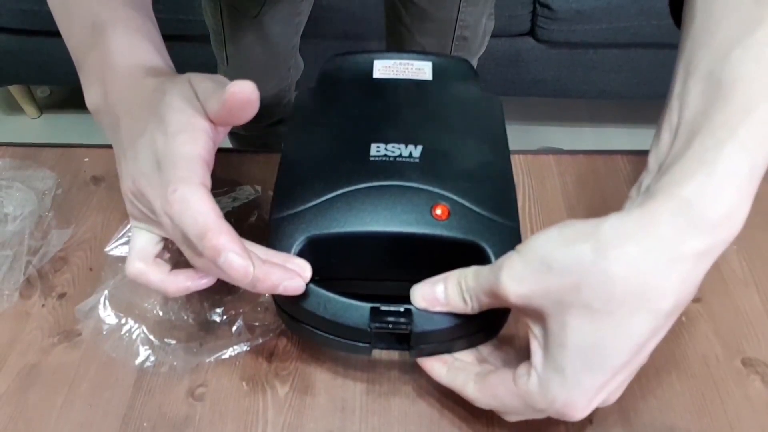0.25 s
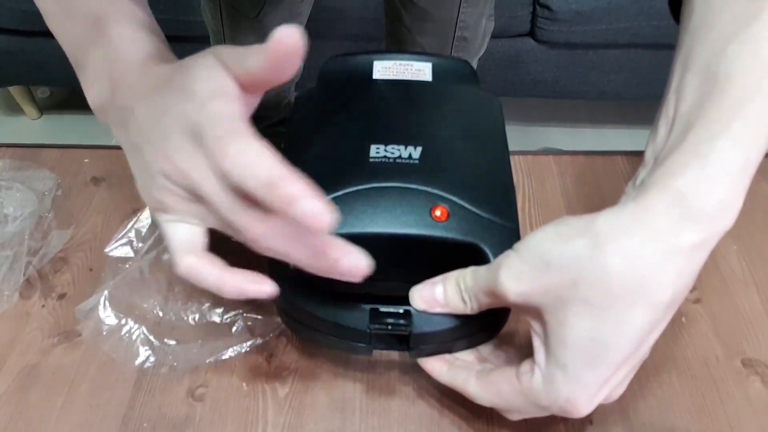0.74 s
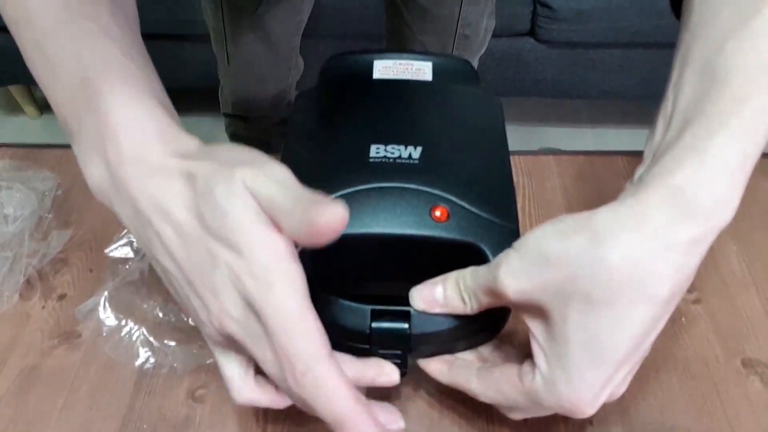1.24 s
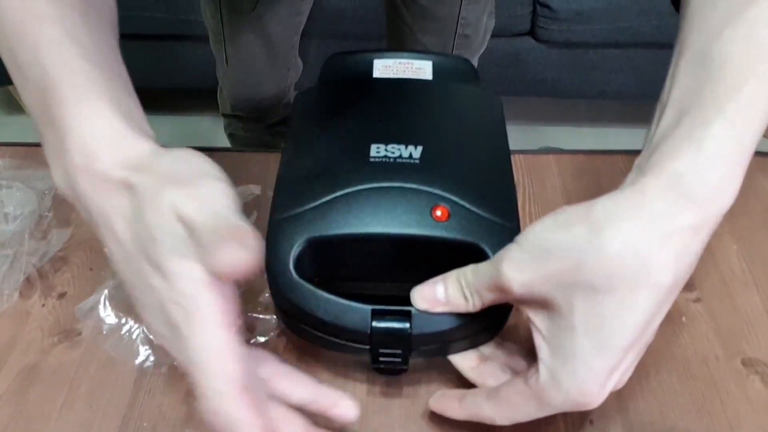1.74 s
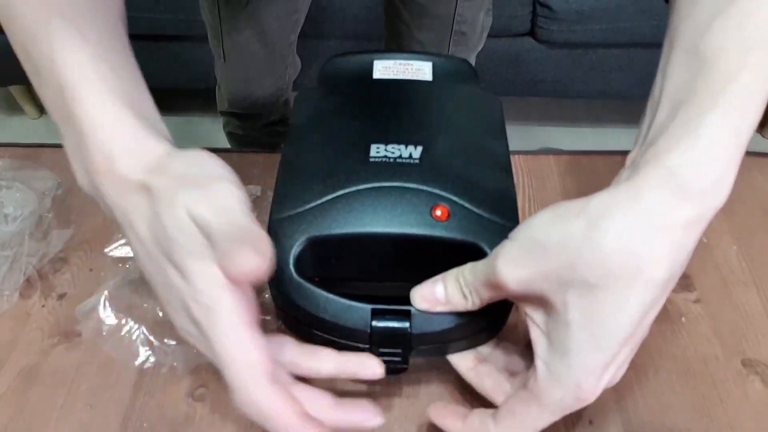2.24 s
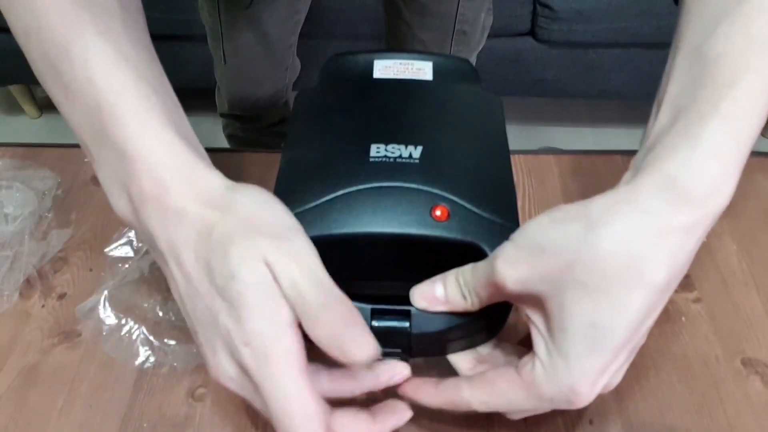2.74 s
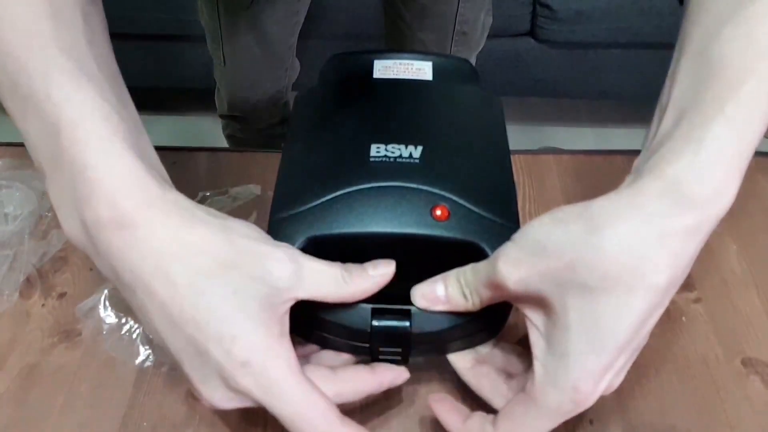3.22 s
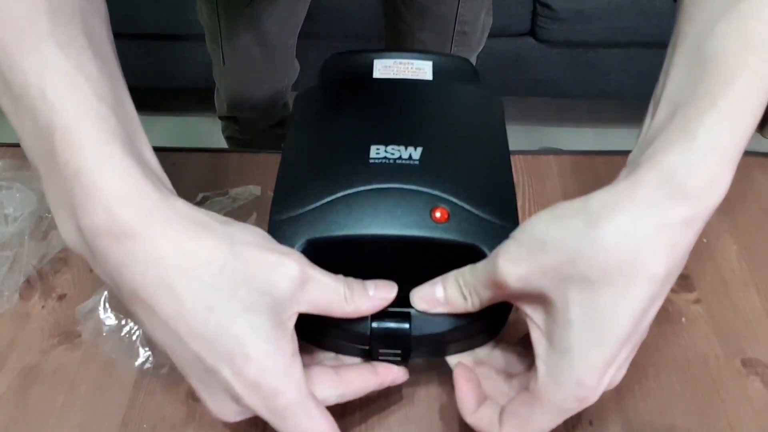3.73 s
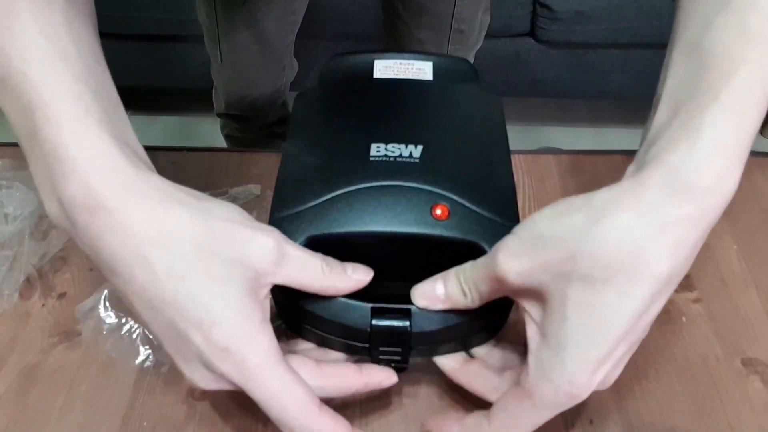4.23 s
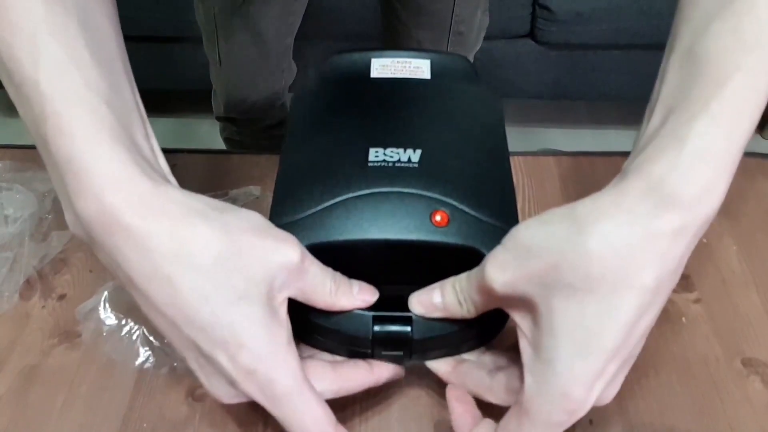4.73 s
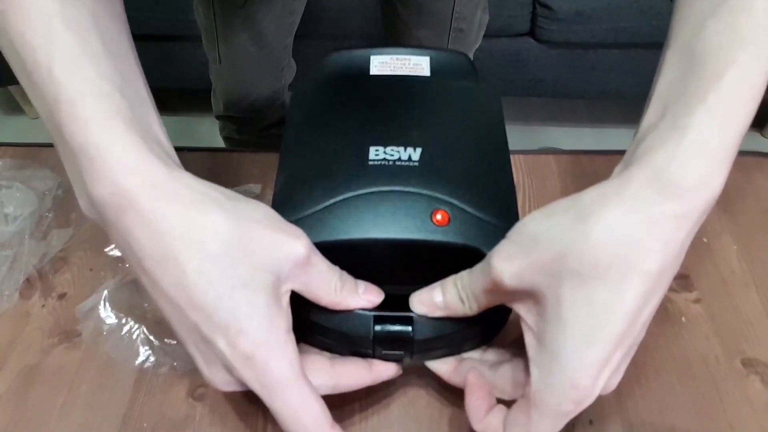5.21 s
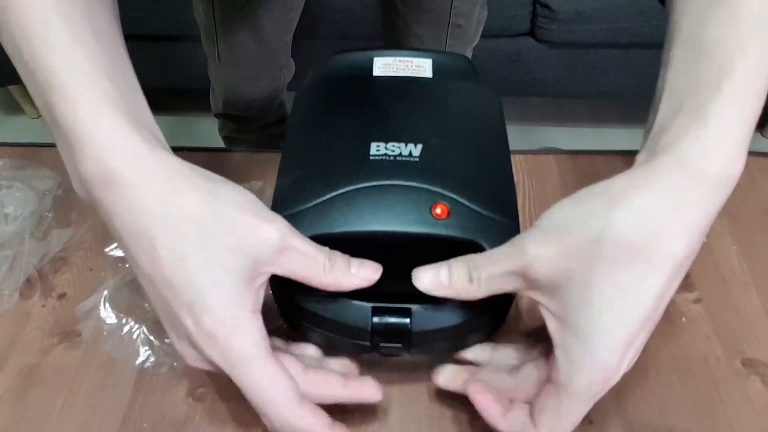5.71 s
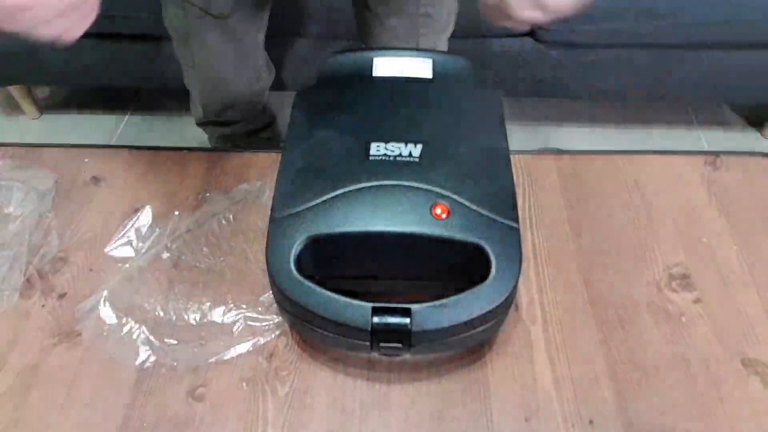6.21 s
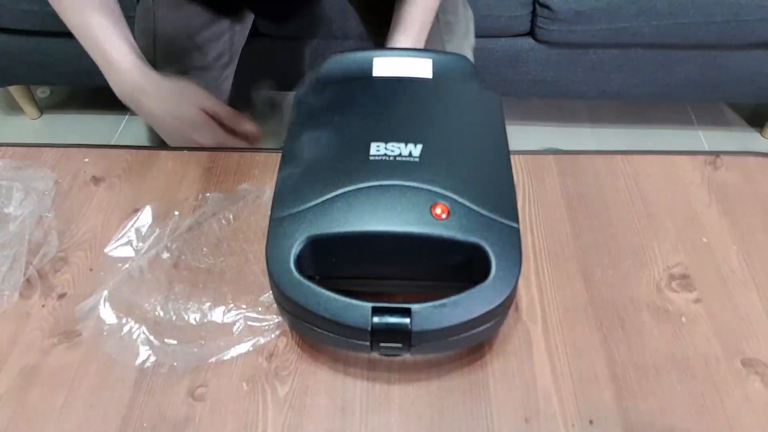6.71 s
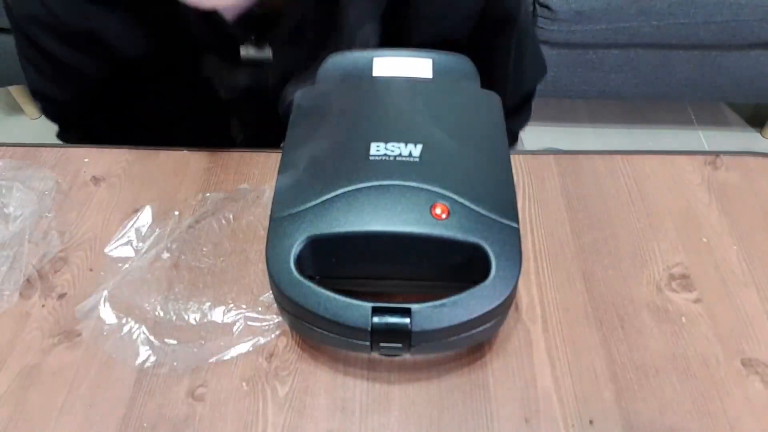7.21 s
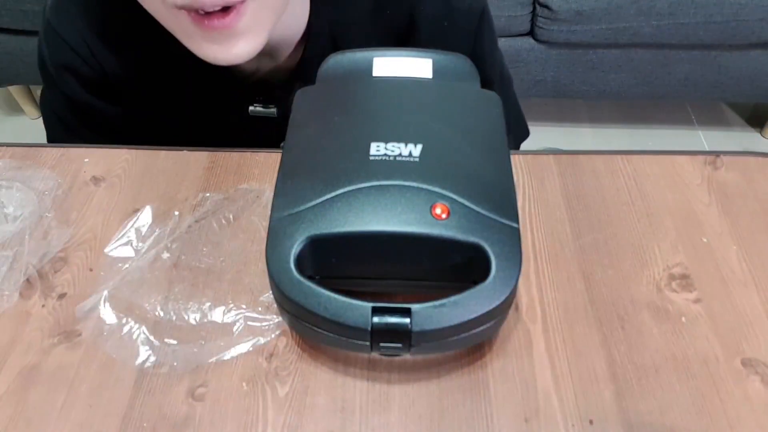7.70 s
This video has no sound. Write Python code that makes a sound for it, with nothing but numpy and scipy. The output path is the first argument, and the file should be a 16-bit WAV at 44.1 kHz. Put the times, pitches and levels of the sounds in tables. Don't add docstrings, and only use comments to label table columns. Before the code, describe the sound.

Fat sizzles fiercely in a closed plastic-cased grill as steam whistles downward and sighs, the latch snaps, the case knocks, and small squeaks follow.

```python
import sys
import numpy as np
from scipy import signal
from scipy.io import wavfile
from scipy.ndimage import uniform_filter1d

SR = 44100
rng = np.random.default_rng(int(sys.argv[2]) if len(sys.argv) > 2 else 0)


def volts_from_decibels(level):
    exponent = np.asarray(level, float) / 20
    return 10 ** exponent


def transcribe(signal):
    frames = np.atleast_2d(signal).T
    limited = np.clip(frames, -1, 1)
    pcm = np.round(limited * 32767).astype(np.int16)
    wavfile.write(sys.argv[1], SR, pcm)


N = 350595


def rms_one(x):
    return x / np.sqrt(np.mean(x ** 2) + 1e-20)


def in_time(rows):
    s, *columns = np.transpose(rows)
    return [np.interp(np.arange(N) / SR, s, column) for column in columns]


def at_hz(points, hz):
    point_hz, point_db = np.transpose(points)
    return np.interp(np.log(hz), np.log(point_hz), point_db)


def drift(rate_hz):
    r = np.exp(-80 * np.pi * rate_hz / SR)
    slow = signal.lfilter([1], [1, -2 * r, r * r], rng.standard_normal(N // 40 + 2002))
    slow = slow[2000:]
    return np.interp(np.arange(N) / 40, np.arange(len(slow)), rms_one(slow - slow.mean()))


def band(x, low_hz, high_hz):
    return signal.sosfilt(signal.butter(2, [low_hz, high_hz], "band", fs=SR, output="sos"), x)


def resonance(x, hz, width_hz):
    r = np.exp(-np.pi * width_hz / SR)
    zeros = np.array([1, 0, -1]) * (1 - r * r) / 2
    return signal.lfilter(zeros, [1, -2 * r * np.cos(2 * np.pi * hz / SR), r * r], x)


def dying(starts, t60_s):
    return signal.lfilter([1], [1, -volts_from_decibels(-60 / (t60_s * SR))], starts)


def grains(per_s, spread_db):
    sizes = volts_from_decibels(spread_db * np.minimum(rng.exponential(1, N), 5)) * rng.choice([-1, 1], N)
    return rms_one(sizes * (rng.random(N) < per_s / SR))


def frying_strength():
    # time in seconds, vigour in dB, fine mist of fat in dB.
    fry = [(0, 8, 5), (.3, 10, 7), (.6, 7.5, 9), (.8, 5.5, 3), (1.15, 3, 6), (1.5, 3, 2), (2.3, 3, 4),
           (3.2, 1.5, 5), (3.6, 2.5, 4.5), (4.5, 4, -0.5), (4.85, 2, 3.5), (5.25, -1.5, 2.5),
           (5.6, -1, -0.5), (6.1, 1.2, 3.5), (6.65, 2, -1), (7.0, 2.5, 5), (7.95, 2, 5.5)]
    # press starts, seam sealed and let go in seconds, loss in dB.
    presses = [
        (1.68, 1.963, 2.06, -4.5),
        (3.9, 4.024, 4.325, -6),
        (5.6, 5.744, 5.93, -1.5),
    ]
    # dB per dB, for the cupping hands plain dB.
    vigour_share = [1.04, 1.05, 0.64, 0.97]
    spray_share = [0.093, 0.081, 0.19, 0.86]
    seal_share = [1.53, 1.6, 1.5, 2.1]
    cupped_db = [1.63, 0.8, -0.5, 4]
    reopen_s, hands_away_s = 0.04, 5.96

    vigour, mist = in_time(fry)
    sealed = 0
    for start, shut, free, loss_db in presses:
        sealed = sealed + in_time([(start, 0), (shut, loss_db), (free, loss_db), (free + reopen_s, 0)])[0]
    cupped, = in_time([(hands_away_s, 1), (hands_away_s + reopen_s, 0)])
    shares = np.transpose([vigour_share, spray_share, seal_share, cupped_db])
    return shares @ [vigour, mist, sealed, cupped]


def sizzle():
    fry_centres_hz = [900, 3200, 7700, 9600]
    # frequency in Hz, level in dB per Hz.
    spectrum = [(18, -52), (30, -15), (239, -15.5), (280, -16), (461, -7), (684, -4.5), (844, -3.5),
                (1190, -7), (2120, -4.5), (3400, -1), (6720, -5.5), (8740, -12), (14000, -17), (16000, -18)]
    # frequency in Hz, side minus mid in dB.
    stereo_width = [(60, -19), (110, -17), (200, -37), (380, -30), (700, -28.5), (1290, -29), (2380, -14),
                    (4400, -15), (8120, -7), (11500, -5.5), (15000, -5)]
    # frequency in Hz, width in Hz, level over the sizzle in dB.
    hollows = [(277.8, 28.5, 11), (669.4, 41.6, 8.5), (853, 60, 0.5), (1073, 66, -0.5), (1200, 73, 4),
               (1452, 33, -6), (1797, 51, -4.5), (2490, 480, -5), (2897, 39, -5), (3400, 51, -4),
               (3860, 59, -0.5), (4165, 43, 1), (4810, 28, -4.5)]
    level_of_all_db, steady = -40, slice(6 * SR, None)

    strength = uniform_filter1d(frying_strength(), size=SR // 30, axis=1)
    strength -= strength[:, steady].mean(axis=1, keepdims=True)
    surge, spray = drift(18.0), drift(24.0)
    bursts = grains(2500 * volts_from_decibels(3.0 * surge), spread_db=9.5)
    white = rng.standard_normal((2, 2, N))
    bass, middle = np.geomspace(28, 450, 8)[:-1], np.geomspace(450, 4500, 11)[:-1]
    edges = np.r_[bass, middle, np.geomspace(4500, 17500, 12)]
    out = 0
    for k, (low, high) in enumerate(zip(edges, edges[1:])):
        hz = np.sqrt(low * high)
        place = np.interp(np.log(hz), np.log(fry_centres_hz), np.arange(4))
        below = min(int(place), 2)
        level_db = strength[below] + (place - below) * (strength[below + 1] - strength[below])
        level_db = level_db * np.clip((hz - 130) / 620, .05, 1)
        bright = np.clip(hz / 9000, 0, 1)
        flicker_db = (0.51 + 0.44 * bright) * surge + 0.66 * (hz > 8500) * spray
        flicker_db = flicker_db + 1.5 * drift(13.3) + bright * drift(2.6)
        share = 0.16 + 0.14 * bright
        source = np.sqrt(1 - share) * white[k % 2] + np.sqrt(share) * bursts * [[1], [.6]]
        gain = volts_from_decibels(at_hz(spectrum, min(hz, 15000)) + level_db + flicker_db)
        out = out + gain * band(source, low, high) * [[1], [volts_from_decibels(at_hz(stereo_width, hz))]]
    out = out + sum(volts_from_decibels(db + 2.45 * drift(6.8)) * resonance(out, hz, width) for hz, width, db in hollows)
    return volts_from_decibels(level_of_all_db) * out / out[0, steady].std()


def jet():
    # time in seconds, level in dB.
    jet_level = [
        (0, -36),
        (.15, -36),
        (.55, -40.5),
        (.7, -48),
        (.9, -49.5),
        (1.2, -77),
        (1.5, -99),
    ]
    # frequency in Hz, width in Hz, level in dB.
    nozzle = [(4900, 500, 8.5), (6150, 900, 7.5), (7300, 1600, 9), (8400, 630, 10), (10540, 580, 8.5),
              (11800, 870, 4)]
    noise = rng.standard_normal(N) * volts_from_decibels(2.5 * drift(10.4))
    shaped = 0
    for k, (hz, width, db) in enumerate(nozzle):
        shaped = shaped + volts_from_decibels(db) * (-1) ** k * resonance(noise, hz, width)
    return volts_from_decibels(in_time(jet_level)[0]) * rms_one(band(shaped, 4500, 12200))


def whistle(hz, width_hz, steady):
    low_pass = signal.butter(2, width_hz / 2, fs=SR, output="sos")
    slow = signal.sosfilt(low_pass, rng.standard_normal((2, len(hz) + 999)))[:, 999:]
    slow = rms_one(slow)
    turn = 2 * np.pi * np.cumsum(hz) / SR
    return rms_one((steady + slow[0]) * np.cos(turn) + slow[1] * np.sin(turn))


def steam_whistles():
    # time in seconds, pitch in Hz, level in dB.
    closing = [
        (0, 1418, -32.5),
        (.05, 1350, -44),
        (.08, 1200, -32.5),
        (.18, 1144, -37),
        (.33, 1090, -40.5),
        (.42, 1075, -42),
        (.5, 1040, -47),
    ]
    # time in seconds, pitch in Hz, level in dB.
    sigh = [
        (.4, 897, -63),
        (.44, 800, -39.5),
        (.55, 800, -38),
        (.63, 800, -44),
        (.8, 952, -43.5),
        (1.0, 944, -55),
    ]
    # start and length in seconds, from Hz, to Hz, level in dB.
    squeaks = [(0.221, 0.2, 3500, 3400, -40), (1.688, .07, 3920, 3700, -45),
               (5.647, 0.034, 2910, 3000, -44.5), (0.27, 0.05, 4900, 4850, -36),
               (3.375, 0.042, 2900, 2900, -41), (4.376, 0.13, 3870, 3860, -36),
               (4.481, .1, 3850, 3730, -41.5), (4.479, 0.093, 2950, 2920, -44),
               (4.671, 0.14, 3700, 3810, -40.5), (6.069, 0.035, 3300, 3500, -43),
               (6.635, 0.065, 2620, 3360, -47), (6.824, 0.033, 2330, 2630, -46),
               (6.85, 0.053, 2750, 3250, -48.5), (6.925, .035, 2430, 2500, -47),
               (7.173, 0.021, 2500, 2620, -46), (7.24, 0.03, 3250, 3500, -48),
               (7.428, 0.063, 2890, 3550, -43), (7.27, .08, 3800, 4050, -45),
               (7.515, 0.022, 4600, 4620, -44), (7.618, 0.041, 2630, 3200, -42.5),
               (7.684, .06, 2200, 2850, -40), (7.735, .045, 2900, 3470, -36),
               (7.045, 0.033, 2500, 3520, -44), (.64, 0.081, 3850, 3850, -43),
               (0.837, .05, 3900, 3950, -45), (0.053, 0.1, 3400, 3450, -37), (.56, 0.094, 2400, 2360, -44),
               (4.368, .09, 4100, 4030, -41), (4.59, 0.035, 3850, 3850, -42),
               (7.925, 0.035, 2900, 3000, -42)]
    # start and length in seconds, from Hz, to Hz, level in dB.
    puffs = [(1.44, 0.085, 3600, 3830, -40), (6.1, 0.099, 4120, 4200, -40), (6.127, 0.1, 3300, 2810, -43.5),
             (.2, 0.18, 3680, 3500, -36), (2.652, .15, 3420, 3340, -42), (2.818, .17, 3220, 3600, -42.5),
             (2.977, 0.2, 3240, 3290, -48), (4.665, .07, 2950, 2800, -40.5), (.45, .1, 3800, 3500, -40),
             (6.86, .08, 3000, 3300, -50), (7.77, .06, 3700, 3700, -43), (2.405, .025, 4200, 4000, -43),
             (2.7, .05, 4000, 3700, -43), (2.53, .08, 3800, 4400, -43.5), (3.11, .06, 3300, 3300, -44.5),
             (3.66, .04, 3500, 3300, -44), (7.222, .025, 3500, 3500, -43),
             (6.325, 0.042, 4300, 3600, -38.5), (7.22, .15, 3600, 5600, -48),
             (7.784, .11, 3440, 4200, -43.5), (7.026, 0.067, 3900, 3660, -43.5)]
    squeak_width_hz, puff_width_hz = 360, 950

    hz, level_db = in_time([*closing, (0.7, 1000, -99)])
    out = volts_from_decibels(level_db) * whistle(hz, width_hz=120, steady=1.7)
    hz, level_db = in_time(sigh)
    out += volts_from_decibels(level_db) * whistle(hz, width_hz=283, steady=0.4)
    for rows, width in [(squeaks, squeak_width_hz), (puffs, puff_width_hz)]:
        for s, length, from_hz, to_hz, db in rows:
            at, n = round(s * SR), round(length * SR)
            swell = np.abs(np.sin(np.linspace(0, np.pi, n))) ** 0.39
            tone = whistle(np.linspace(from_hz, to_hz, n), width, steady=squeak_width_hz / width)
            out[at:at + n] += (volts_from_decibels(db) * swell * tone)[:N - at]
    return out


def ticks():
    shape = dying(np.abs(grains(per_s=44, spread_db=2.0)) + 1e-18, t60_s=0.01)
    return volts_from_decibels(-64) * rms_one(band(shape * rng.standard_normal(N), 9000, 16500))


def spits():
    # start in seconds, peak in dB, body re peak in dB, length in seconds.
    droplets = [(0.69, -33, -12, 0.03), (0.822, -28.5, -12, 0.041), (0.912, -27.5, -14, 0.036),
                (1.345, -32, -4, 0.015), (1.481, -32, -42, 0.029), (1.752, -27.5, -7, 0.006),
                (1.935, -28, -14, 0.0051), (2.5, -29, -38, 0.013), (2.846, -32, -22, 0.022),
                (3.0694, -32, -4.5, 0.0069), (3.539, -32.5, 13.5, 0.054), (3.772, -32.5, 12, 0.056),
                (3.866, -30, 0, 0.014), (3.965, -37, -4.5, 0.014), (4.346, -33.5, -12, 0.01),
                (4.555, -31.5, 11, 0.013), (4.598, -33, 10, 0.033), (4.955, -34.5, -4, 0.021),
                (5, -32.5, -18.5, 0.0086), (5.135, -37.5, -12.5, 0.029), (5.3183, -50, -22, 0.014),
                (5.335, -35, -17.5, 0.031), (5.541, -32, -15, 0.01), (6.082, -32, -9.5, 0.067),
                (6.6932, -47, 0, 0.0078), (6.756, -35, -23.5, 0.028), (6.995, -33, -20, 0.006),
                (7.041, -32, -9, 0.016), (7.524, -42, 19.5, 0.01), (7.756, -42, 4, 0.008)]
    shape = np.zeros((2, N))
    for s, peak_db, body_db, length in droplets:
        t = np.arange(int(.15 * SR)) / SR / length
        at = round(s * SR)
        puff = (3 * t * np.exp(1 - 3 * t)) ** 2 * volts_from_decibels([[peak_db - 6.5], [peak_db + body_db - 7]])
        shape[:, at:at + len(t)] += puff[:, :N - at]
    bright, body = shape * rng.standard_normal((2, N))
    return band(bright, 6200, 15000) + band(body, 2200, 3700)


def taps():
    # start in seconds, peak in dB, frequency in Hz, T60 in seconds.
    contacts = [(0.755, -29, 2490, .03), (1.2695, -29, 11300, .006), (1.272, -24, 4000, .006),
                (1.2733, -17.5, 5000, .007), (1.2734, -23.5, 7200, .006), (1.275, -21, 2000, .009),
                (1.2775, -22, 8500, .006), (1.278, -20, 5030, .008), (1.3094, -13.5, 4200, .008),
                (1.31, -15, 7300, .006), (1.3093, -20, 11700, .006), (1.3098, -21, 5800, .005),
                (1.3125, -17.5, 2040, .009), (1.3127, -17, 4300, .007), (1.3158, -24, 9500, .007),
                (1.316, -24, 7800, .008), (1.3165, -21, 2020, 0.0098), (1.3168, -25, 5030, .007),
                (1.3225, -24, 4400, .012), (1.3333, -23, 3800, .016), (2.2927, -27, 1690, 0.04),
                (4.7826, -19, 1510, .014), (4.783, -24, 3500, .012), (4.7835, -31, 10700, .008),
                (4.784, -31, 7600, .008), (4.7951, -17, 3500, 0.0058), (4.7956, -23, 10700, .006),
                (4.7966, -10, 3500, .007), (4.796, -19, 6300, .006), (4.7963, -9, 1030, .03),
                (4.7964, -15, 1440, .02), (4.8, -28, 4700, .008), (4.801, -24, 6800, .007),
                (4.802, -27, 2400, .008), (4.815, -22, 1050, .03), (4.846, -28, 990, .04),
                (4.862, -31, 996, .04), (4.905, -32, 1100, .04), (7.226, -37, 3350, .04),
                (7.228, -34, 3670, .03), (7.522, -38, 4606, .02), (7.652, -30.5, 3950, .03),
                (7.654, -38.5, 4650, 0.034), (7.766, -30, 5300, .018), (7.766, -30, 3800, 0.022),
                (7.767, -35, 4600, .015), (7.043, -30, 4100, 0.027)]
    t, out = np.arange(int(.05 * SR)) / SR, np.zeros(N + SR)
    attack = np.minimum(t / .00015, 1)
    for s, db, hz, t60 in contacts:
        at = round(s * SR)
        slip = 1 + 1.5 * uniform_filter1d(rng.standard_normal(len(t)), size=9)
        out[at:at + len(t)] += volts_from_decibels(db - 60 * t / t60) * attack * np.sin(2 * np.pi * hz * t) * slip
    return out[:N]


def struck(times, levels_db, modes, soft_hz, sign=-1):
    at, out = np.round(times * SR).astype(int), np.zeros(N)
    chance_db = rng.normal(0, 2.1, (len(at), len(modes)))
    for k, (hz, db, t60) in enumerate(modes):
        clicks = np.full(N, 1e-18)
        clicks[at] = volts_from_decibels(levels_db + db + chance_db[:, k]) * sign ** k
        r, w = volts_from_decibels(-60 / (t60 * SR)), 2 * np.pi * hz / SR
        out += signal.lfilter([0, np.sin(w)], [1, -2 * r * np.cos(w), r * r], clicks)
    return signal.sosfilt(signal.butter(2, soft_hz, fs=SR, output="sos"), out)


def knocks():
    # time in seconds, peak in dB.
    jolts = [(0.898, -65.5), (1.309, -58), (1.77, -58), (1.999, -65), (2.643, -60), (3.532, -54.5),
             (3.639, -57.5), (3.934, -41.5), (3.991, -53), (4.05, -63), (4.201, -65.5), (4.35, -65),
             (4.46, -67.5), (4.72, -52), (4.793, -48), (4.87, -61), (5.02, -59), (5.586, -63.5),
             (5.81, -89), (6.95, -67)]
    # time in seconds, thud peak in dB,
    # then hollow rap, latch rap and crack in dB re thud.
    blows = [(1.2708, -36, 15.5, 6, 13), (1.309, -33.5, 13, 6, 13.5), (1.766, -29, 4.5, -9, -5.5),
             (1.981, -49.5, -19, -22, 7), (2.292, -44.5, 13.5, 14, 17.5), (2.626, -40.5, -16, -26, -12),
             (2.658, -48, -12, -7, 1), (2.72, -56, 4.5, 1, 22.5), (3.529, -30, -9, -23.5, -5.5),
             (3.629, -44, -6, -10, -4), (3.926, -39, 0, 7, 0), (3.9327, -16, -11, -24, -11.5),
             (4.195, -44, 8, 9, -1.5), (4.35, -38.5, 4, -2, -3), (4.716, -36, -18, -2, -1),
             (4.782, -31.5, -1, 2, 5), (4.794, -24, 0, 7, 1), (4.7955, -34, 9, 15.5, 6),
             (5.036, -63, 9, -6, 5), (5.574, -46, -6, 2, 5)]
    # frequency in Hz, level in dB, T60 in seconds.
    boom_modes = [(51, 10, 0.09), (87.6, 7, 0.24), (135, 14, 0.12)]
    thud_modes = [(185, -19, 0.012), (245.4, -8, 0.33), (270, 3, 0.085), (283.5, -5, 0.25),
                  (352, -45, 0.042), (390, -18, 0.28), (523, -17, 0.041)]
    rap_modes = [(644, 0.5, 0.047), (702, -0.5, 0.039), (770, -1, 0.081), (867, 7, 0.019)]
    latch_modes = [(500, -2.5, 0.037), (963, -4, 0.083), (1050, 0.5, 0.073), (1200, -13, 0.037),
                   (1300, 1.5, 0.026), (1550, 3.5, 0.027)]
    crack_modes = [(1705, 0, 0.016), (2230, -1, 0.019), (3100, 4, 0.0077), (3670, 3.5, 0.0086),
                   (4200, 4.5, 0.011), (5360, -2.5, 0.011), (6200, 1, 0.008), (7300, 0, 0.014)]

    s, thud_db, rap_db, latch_db, crack_db = np.transpose(blows)
    s = s + 0.000957
    at = np.round(s * SR).astype(int)
    hard = struck(s, thud_db + rap_db - 4.5, rap_modes, soft_hz=3000)
    hard += struck(s, thud_db + latch_db - 10.5, latch_modes, soft_hz=4000, sign=0.93)
    hard += struck(s, thud_db + crack_db - 5.0, crack_modes, soft_hz=13800)
    marks = np.full(N, 1e-18)
    marks[at] = volts_from_decibels(thud_db + crack_db - 0.5)
    snap = dying(marks, t60_s=0.0062) * rng.standard_normal(N)
    hard += band(snap, 1800, 12500)
    marks[at] = volts_from_decibels(thud_db + latch_db - 3.0)
    buzz = dying(marks, t60_s=0.2) * rng.standard_normal(N)
    hard += band(buzz, 780, 1480)
    rebound = round(.0058 * SR)
    hard[rebound:] += volts_from_decibels(-10.5) * hard[:-rebound]
    soft = band(struck(s, thud_db - 3.5, thud_modes, soft_hz=700, sign=0.98), 88, 1700)
    soft = soft + struck(*np.transpose(jolts), boom_modes, soft_hz=138)
    soft = signal.sosfilt(signal.butter(2, 45, "high", fs=SR, output="sos"), soft)
    return soft, band(hard, 340, 14000)


def room(x):
    t60_s, level_db = 0.3, -11
    t = np.arange(int(.6 * SR)) / SR
    tail = rng.standard_normal((2, len(t))) * volts_from_decibels(-60 * t / t60_s) * (t > .004)
    tail = signal.lfilter([.5], [1, -.55], tail)
    tail = tail / np.sqrt((tail ** 2).sum(axis=1, keepdims=True))
    return volts_from_decibels(level_db) * signal.fftconvolve(x[None], tail)[:, :N]


def scene():
    # frequency in Hz, width in Hz, depth from 0 to 1.
    dips = [(4350, 910, 0.18), (5800, 890, 0.46), (9330, 2000, 0.26), (13100, 280, 0), (15650, 570, 0.6)]
    # frequency in Hz, width in Hz, share added left and taken right.
    ports = [(8200, 740, -.3), (9300, 900, 0.38), (11000, 900, -0.19), (12300, 1200, 0.15),
             (13500, 900, -0.086)]

    mid, side = sizzle()
    soft, hard = knocks()
    wet = room(hard + .15 * soft)
    hard = hard + taps()
    mid = mid + soft + hard + spits() + steam_whistles()
    for hz, width, depth in dips:
        mid = mid - depth * resonance(mid, hz, width)
    mid = mid + wet[0] + jet() + ticks()
    bent = np.r_[np.zeros(4), np.gradient(mid)[:-4]]
    side = side + 0.038 * bent
    side = side + 0.34 * band(wet[1], 2200, 16000) + volts_from_decibels(-23.0) * wet[1]
    side = side + volts_from_decibels(-45.0) * soft + volts_from_decibels(-32.0) * hard
    side = side + sum(share * resonance(mid, hz, width) for hz, width, share in ports)
    return np.array([mid + side, mid - side])


def roll_off(x):
    return signal.sosfilt(signal.butter(12, 16720, fs=SR, output="sos"), x)


def record(dry):
    steep = signal.ellip(14, .5, 45, 15780, fs=SR, output="sos")
    return roll_off(signal.sosfilt(steep, dry))


dry = scene()
out = record(dry)
transcribe(out)
```